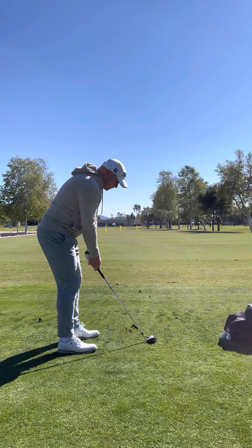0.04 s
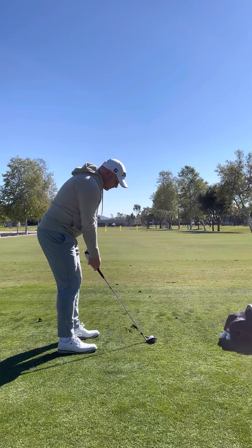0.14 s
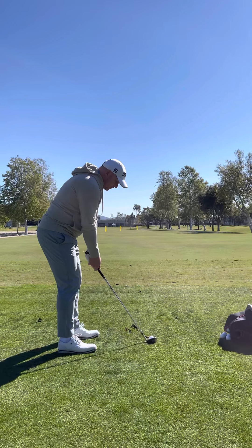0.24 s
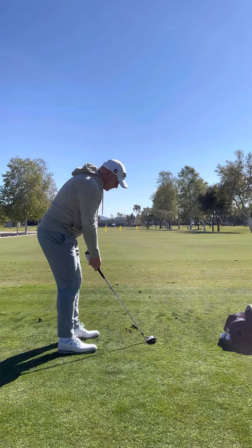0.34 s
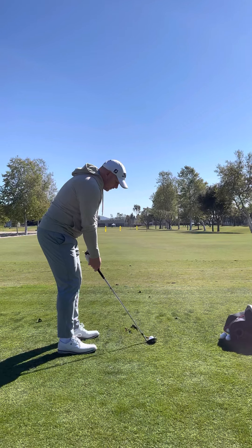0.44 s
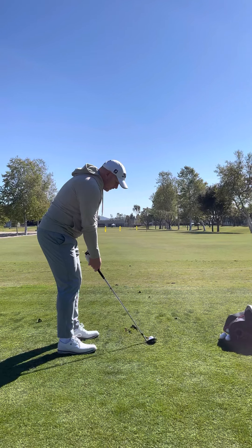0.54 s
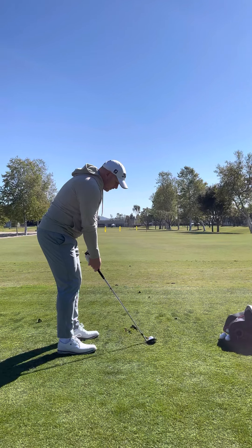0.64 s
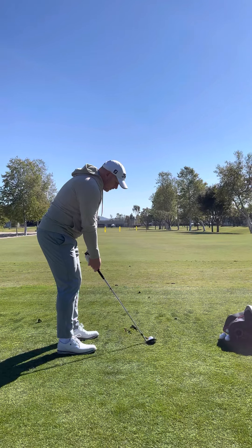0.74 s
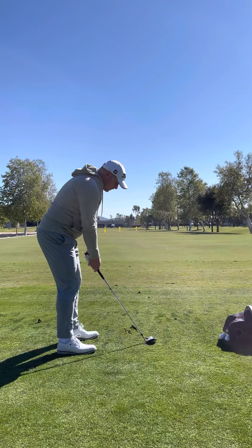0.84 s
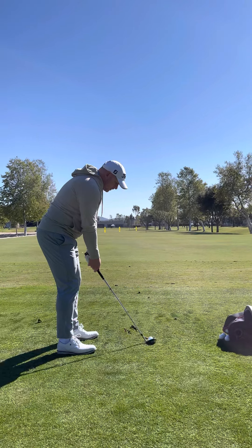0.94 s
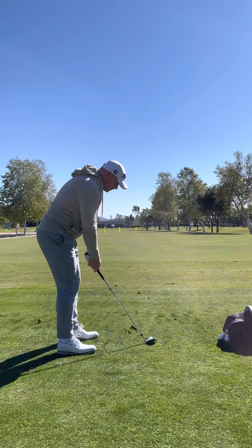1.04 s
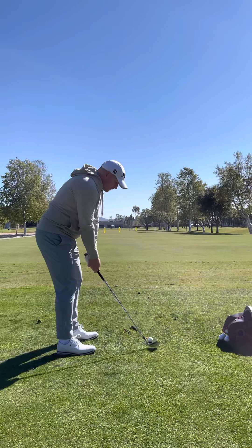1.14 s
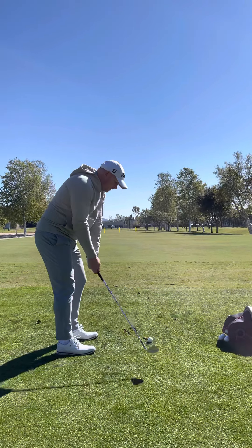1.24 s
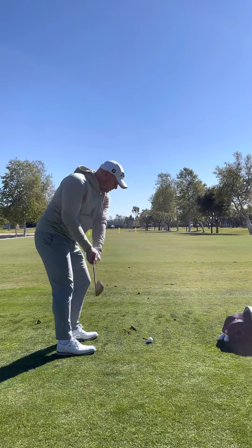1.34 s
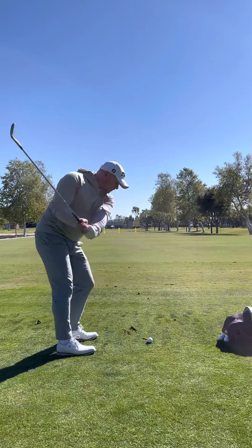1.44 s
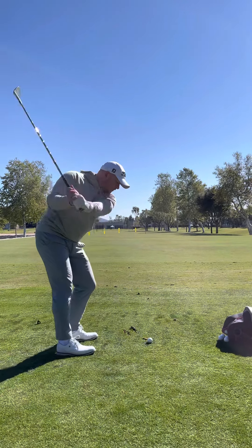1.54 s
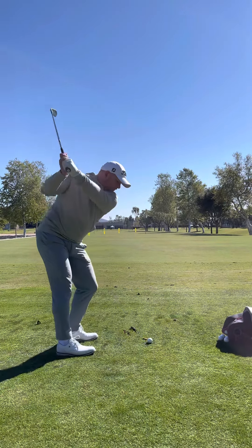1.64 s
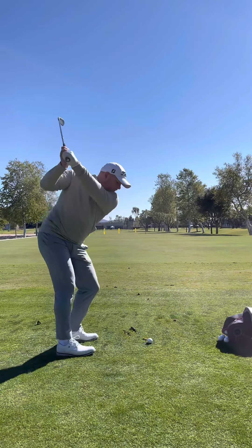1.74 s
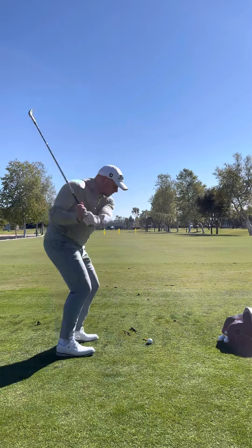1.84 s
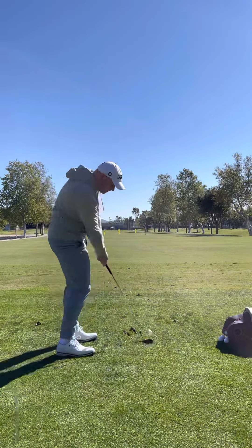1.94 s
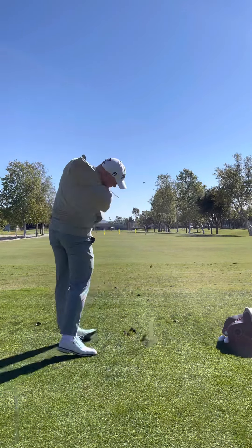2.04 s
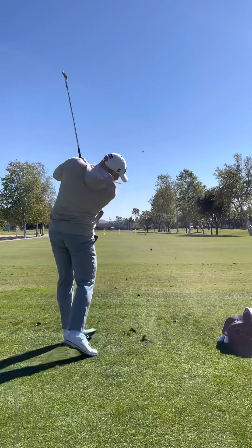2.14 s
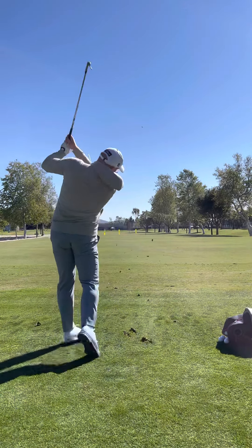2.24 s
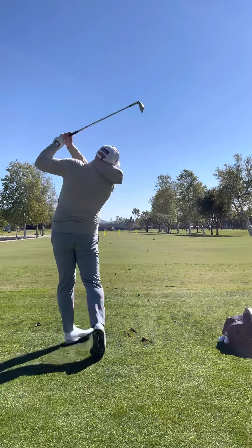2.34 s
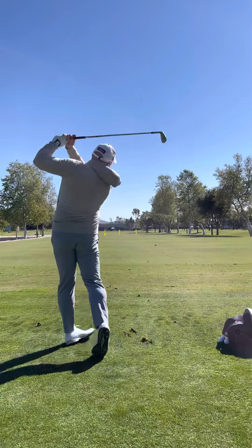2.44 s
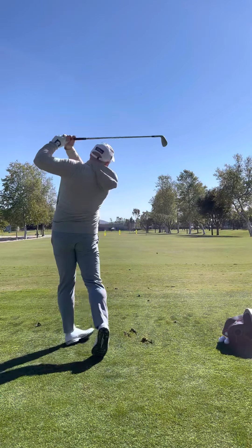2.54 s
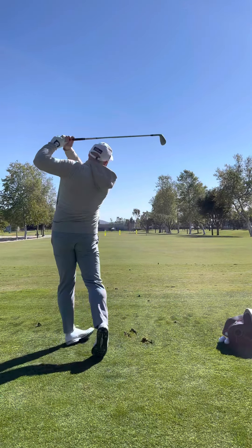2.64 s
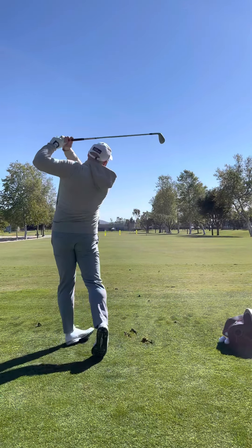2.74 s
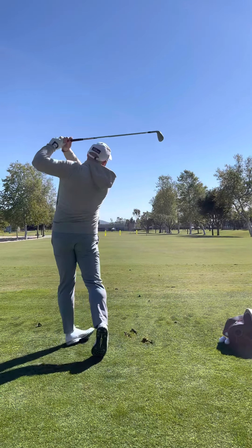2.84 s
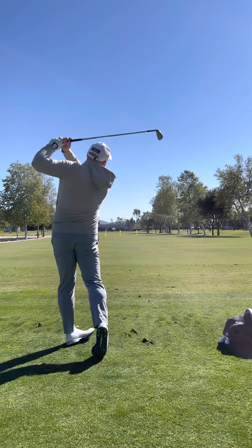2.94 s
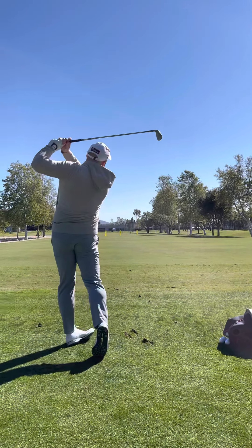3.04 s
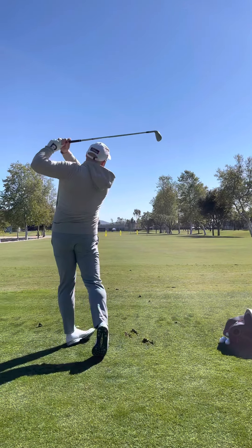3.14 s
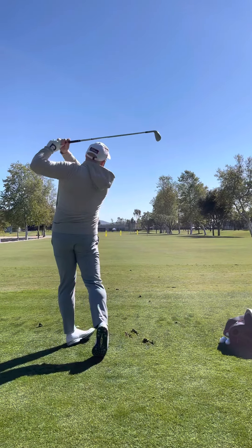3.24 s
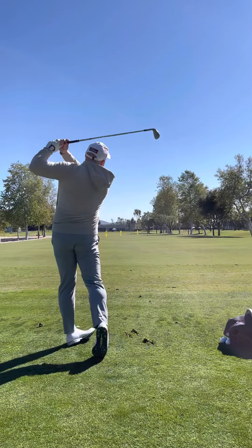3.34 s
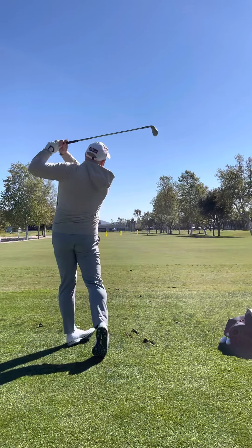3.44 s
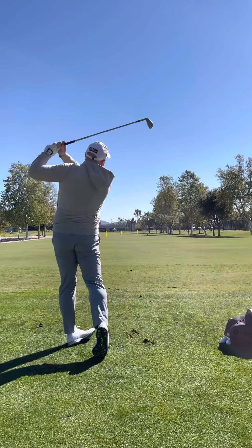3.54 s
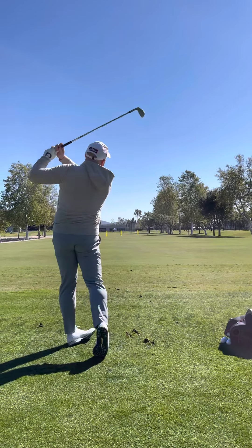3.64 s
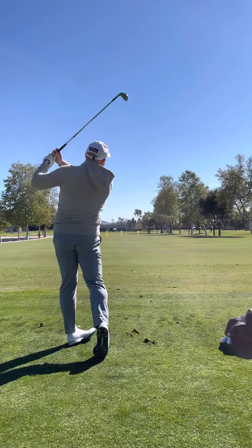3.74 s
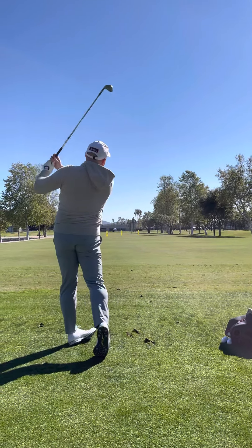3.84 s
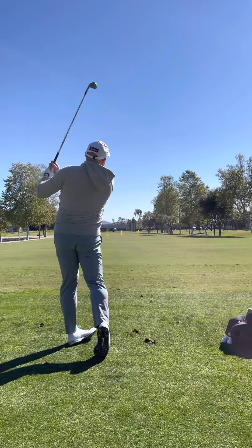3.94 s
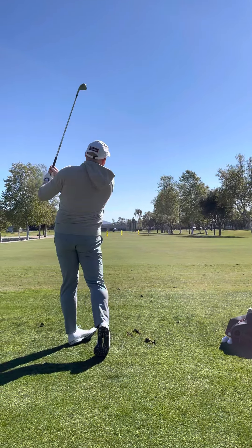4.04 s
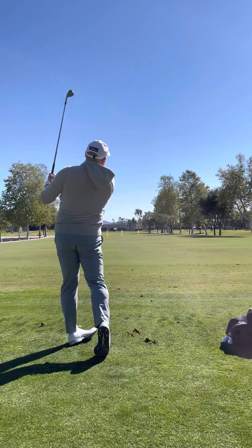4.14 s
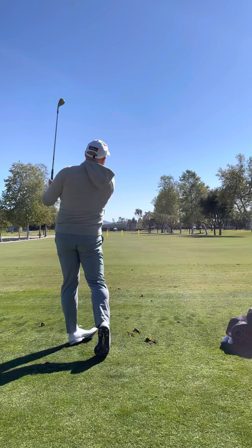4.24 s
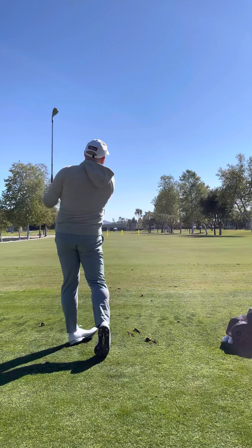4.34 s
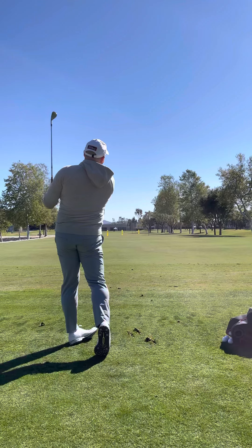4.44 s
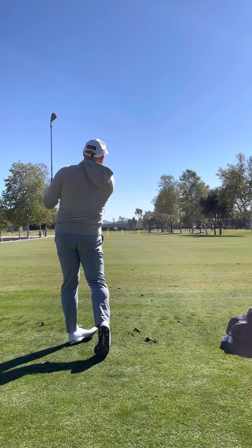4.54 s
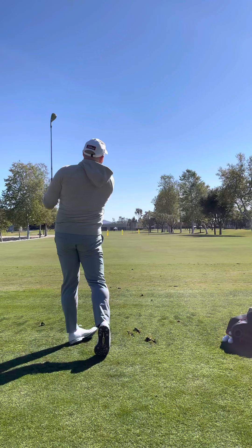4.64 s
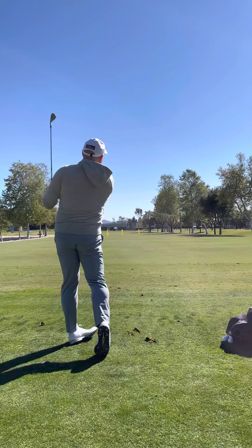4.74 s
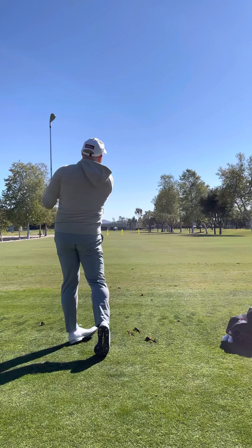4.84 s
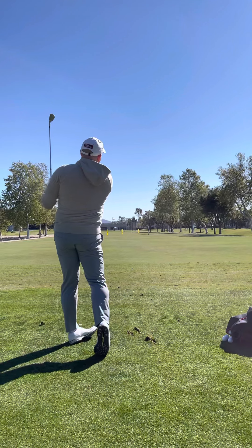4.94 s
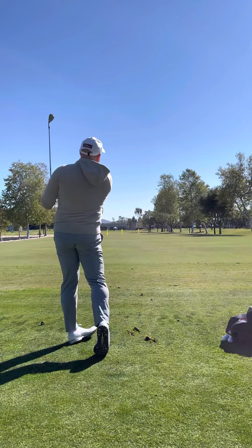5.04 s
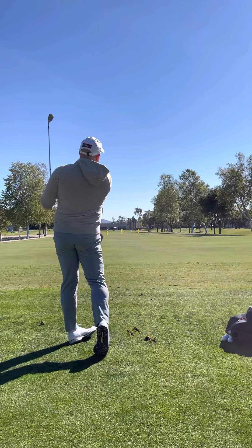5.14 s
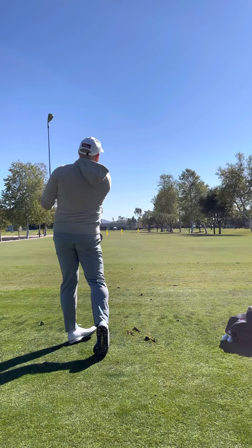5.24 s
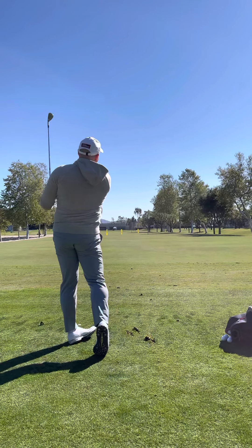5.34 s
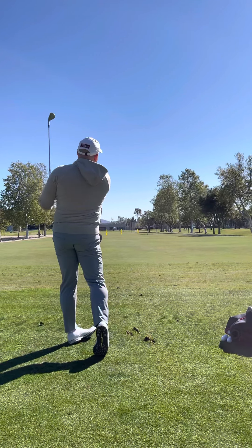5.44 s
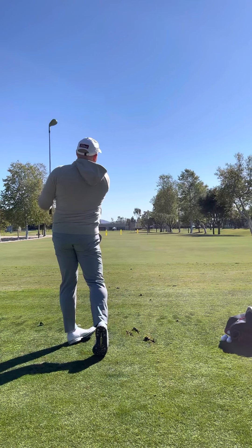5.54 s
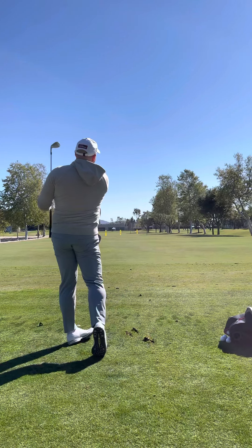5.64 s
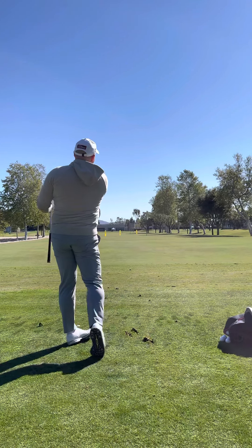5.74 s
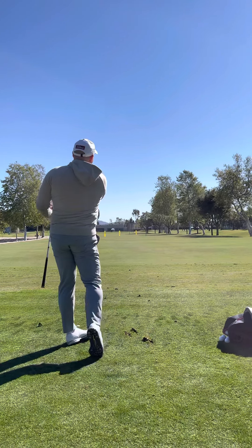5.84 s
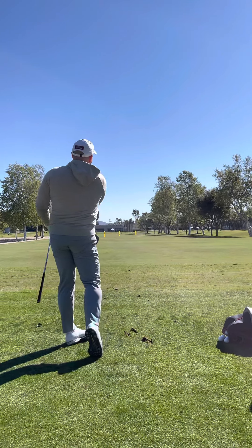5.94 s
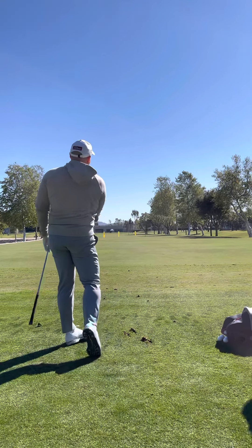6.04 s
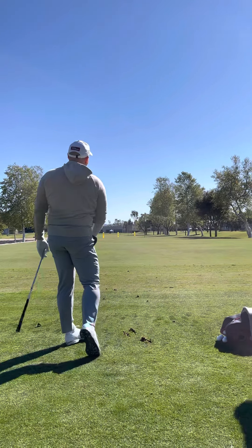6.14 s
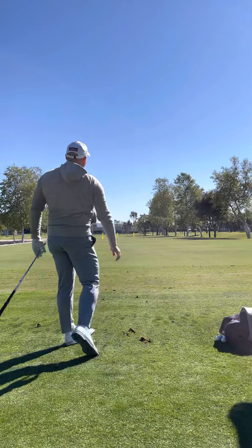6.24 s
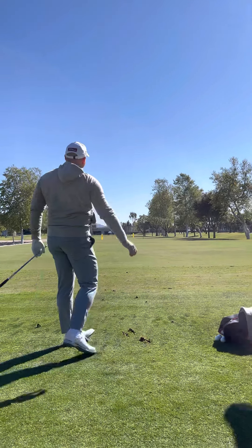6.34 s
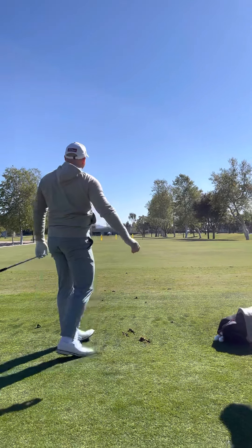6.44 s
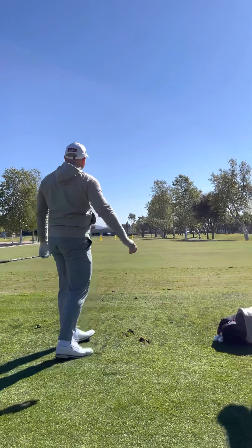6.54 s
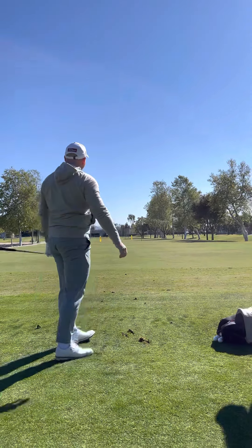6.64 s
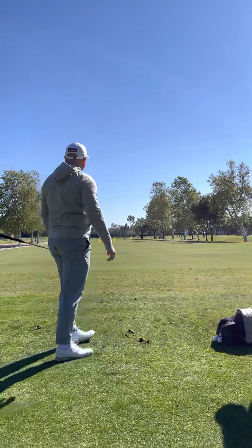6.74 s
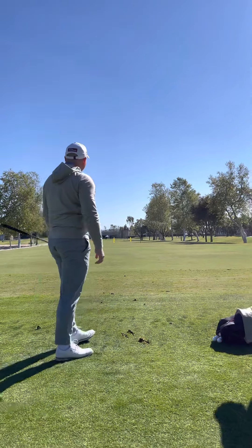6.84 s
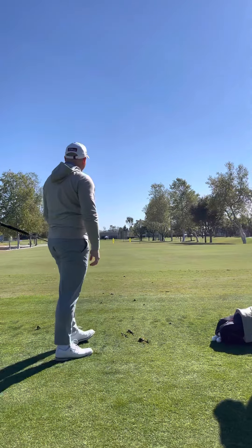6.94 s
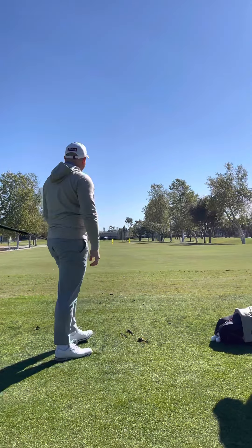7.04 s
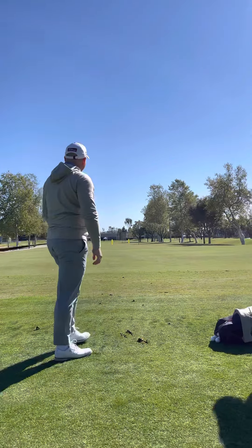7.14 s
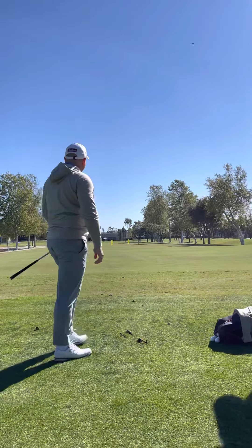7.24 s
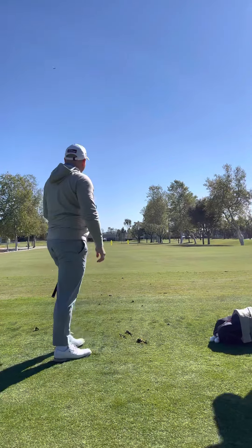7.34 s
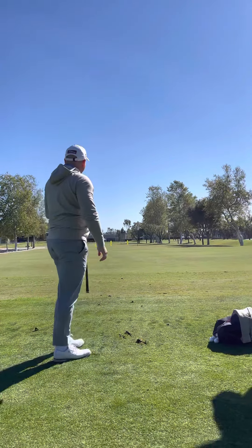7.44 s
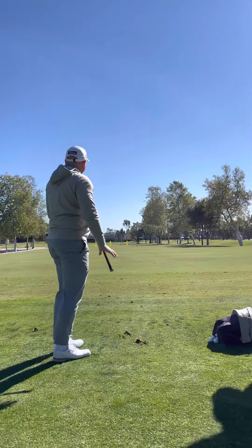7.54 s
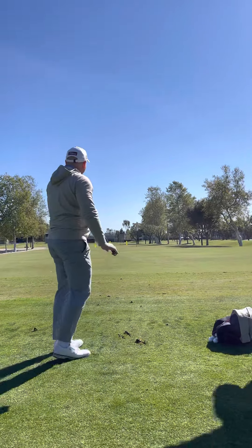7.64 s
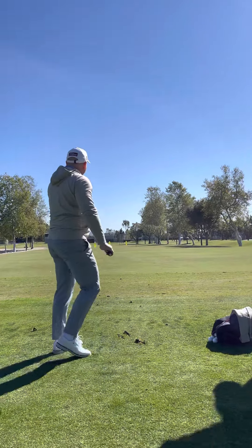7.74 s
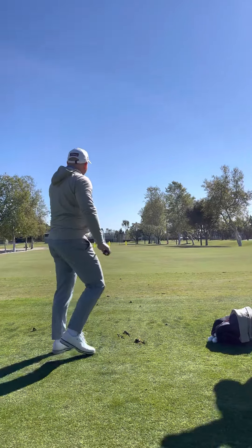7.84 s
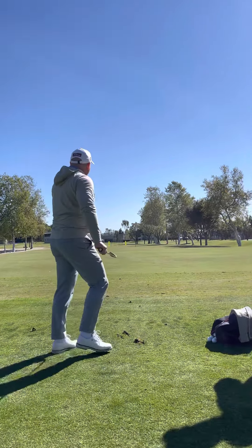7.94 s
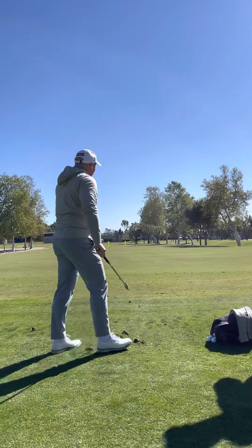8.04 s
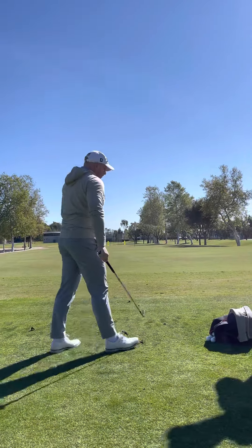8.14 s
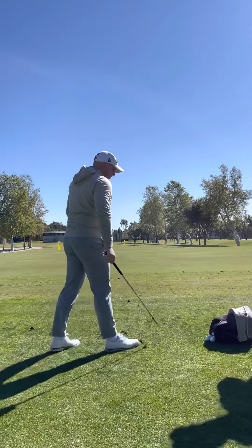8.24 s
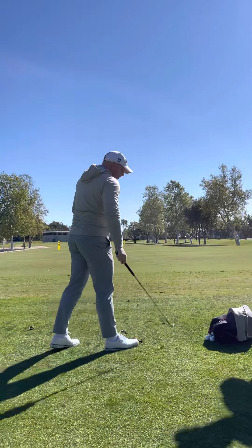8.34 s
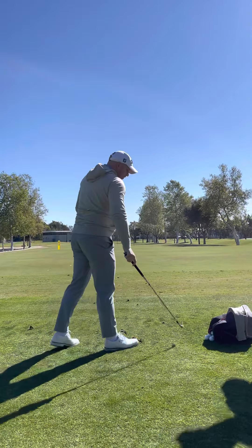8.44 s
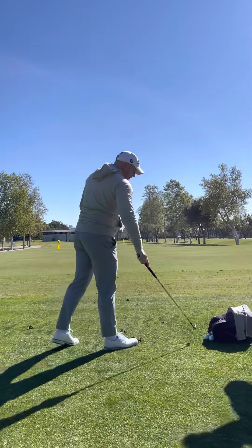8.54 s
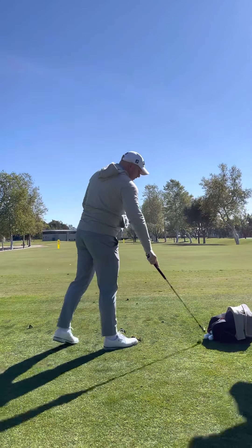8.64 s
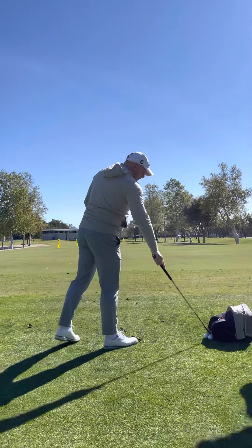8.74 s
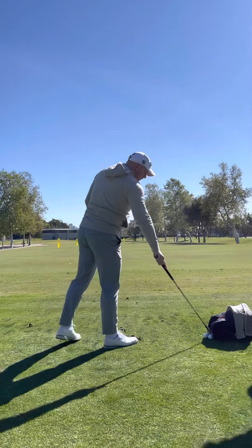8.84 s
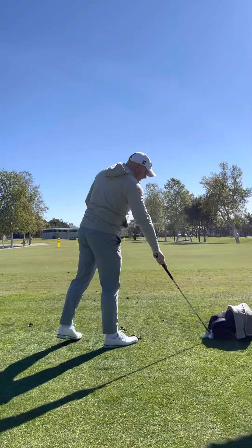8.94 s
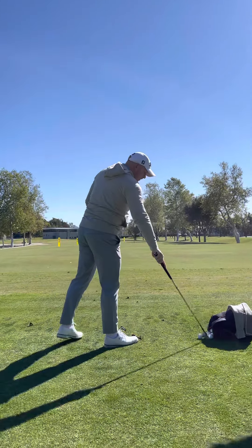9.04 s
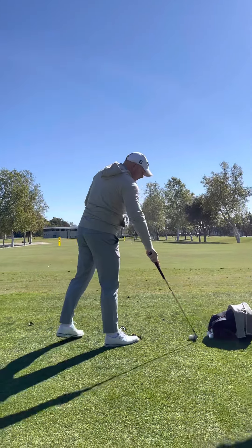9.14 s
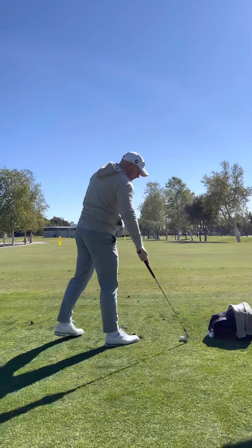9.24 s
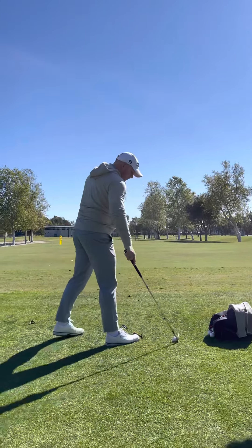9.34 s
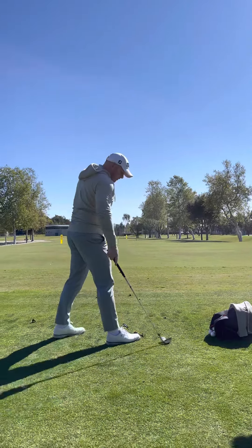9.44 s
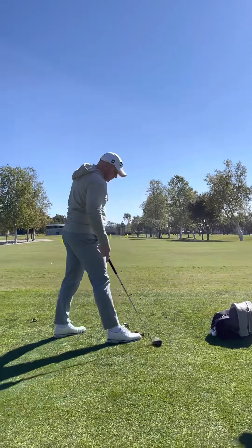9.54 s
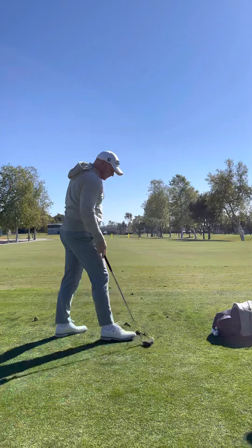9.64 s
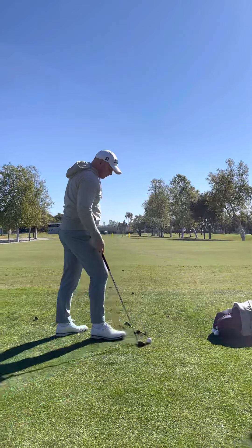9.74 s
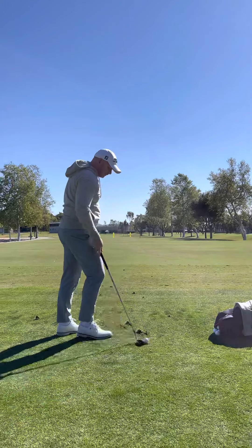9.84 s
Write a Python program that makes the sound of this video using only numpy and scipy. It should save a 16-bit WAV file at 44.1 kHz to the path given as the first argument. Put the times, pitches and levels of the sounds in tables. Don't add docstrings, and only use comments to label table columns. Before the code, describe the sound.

A golfer's iron shot heard close by a phone on open grass. Quiet rustling and light ticks precede a brief rush of air and one hard, bright crack with a deep ground thud and short tree echoes. Torn soil scatters and ticks back down. Quiet birds and far traffic follow, then moving clothes, a dull leg tap, a buzzy bird call, whistles, and a bumped stand with clicking balls.

```python
import sys
import numpy as np
from scipy import signal
from scipy.fft import rfft, irfft, next_fast_len
from scipy.io import wavfile
from scipy.ndimage import uniform_filter1d, map_coordinates

SR = 44100
rng = np.random.default_rng(int(sys.argv[2]) if len(sys.argv) > 2 else 0)


def volts_from_decibels(level):
    exponent = np.asarray(level, float) / 20
    return 10 ** exponent


def transcribe(signal):
    frames = np.atleast_2d(signal).T
    limited = np.clip(frames, -1, 1)
    pcm = np.round(limited * 32767).astype(np.int16)
    wavfile.write(sys.argv[1], SR, pcm)


N = 435708
SOIL_SETTLES_S = 2.89


def unit(x):
    return x / np.sqrt(np.mean(x ** 2) + 1e-20)


def along(points, hz):
    f, v = np.transpose(points)
    return np.interp(np.log(hz + 1), np.log(f + 1), v)


def curves(rows, **ends):
    s, *cols = np.transpose(rows)
    return [np.interp(np.arange(N) / SR, s, c, **ends) for c in cols]


def wobble(rate):
    knots = rng.standard_normal(int(N * rate / SR) + 4)
    return map_coordinates(knots, [np.arange(N) * rate / SR])


def filtered(x, response):
    m = next_fast_len(N + 8192)
    return irfft(rfft(x, m) * response(np.fft.rfftfreq(m, 1 / SR)), m)[..., :N]


def causal(points):
    cepstrum = irfft(np.log(volts_from_decibels(along(points, np.fft.rfftfreq(4096, 1 / SR)))))
    cepstrum[1:2048] *= 2
    cepstrum[2049:] = 0
    h = irfft(np.exp(rfft(cepstrum)))[:2048]
    return h / np.linalg.norm(h)


def pair(spectrum, alike, grain_db=0):
    noise = rng.standard_normal((2, N)) * volts_from_decibels(grain_db * wobble(500))

    def response(hz):
        turn = np.arccos(np.clip(along(alike, hz), -1, 1)) / 2
        return volts_from_decibels(along(spectrum, hz)) * [np.cos(turn), np.sin(turn)]

    mid, side = filtered(noise, response)
    return unit(np.array([mid + side, mid - side]))


def patchy(x, depth_db):
    z = signal.stft(x, nperseg=512)[2]
    field = uniform_filter1d(rng.standard_normal(z.shape[1:]), size=6, axis=0)
    field = uniform_filter1d(field, size=8, axis=1)
    return unit(signal.istft(z * volts_from_decibels(depth_db * unit(field)), nperseg=512)[1][:, :N])


def strokes(rows):
    t = np.arange(N) / SR
    total = 0
    for s, db, rise, fall, coarse_db in rows:
        swell = volts_from_decibels(db - 30 * np.maximum((s - t) / rise, (t - s) / fall))
        total = total + swell * volts_from_decibels([[0], [coarse_db]])
    return total


# (time [s], level [dB])
TRAFFIC = [(0.0, -44.5), (1.87, -43.5), (2.04, -46), (2.89, -42.5), (4.79, -43), (5.03, -42), (6.58, -44.5),
           (6.85, -45.5), (7.84, -44), (8.26, -46.5), (8.56, -43.5), (9.88, -44)]
# (frequency [Hz], density [dB per Hz])
AIR = [(22, -29.5), (40, -6), (65, -1), (90, -0.5), (130, -8.5), (200, -16), (300, -24.5), (600, -32.5),
       (1100, -35.5), (1600, -44), (2300, -50), (3200, -58), (4500, -61), (6000, -80)]
# (frequency [Hz], likeness [0-1])
AIR_ALIKE = [(60, .998), (110, .996), (200, .97), (400, .72), (700, .45), (1300, .75), (1800, .9),
             (2300, .4), (4500, .6), (7000, .8), (9000, .98)]
# (frequency [Hz], density [dB per Hz])
HISS = [(1500, -37), (3000, -5.5), (6000, -3), (8000, -2.5), (10500, 1.5), (11800, -2), (12600, -19),
        (14000, -40)]
# (frequency [Hz], density [dB per Hz])
LEAVES = [(1500, -30), (2400, -1), (3500, -2.5), (5000, -4.5), (5800, -10), (8000, -31), (12000, -70)]
# (start [s], end [s], leaf level [dB])
GUSTS = [
    (1.5, 2.6, -81.5),
    (5.5, 6.6, -82),
    (7.05, 7, -76.5),
    (9.9, 10.5, -74.5),
]


def background():
    t = np.arange(N) / SR
    rumble_db, = curves(TRAFFIC)
    hum_db = -59.5 + 0.16 * (rumble_db - rumble_db.mean())
    calm_db, gust_ramp_s = -91, 0.39
    leaves_db = calm_db
    for start, end, db in GUSTS:
        gust = np.clip(1 + np.minimum(t - start, end - t) / gust_ramp_s, 0, 1)
        leaves_db = leaves_db + (db - calm_db) * gust
    duck_s, duck_length_s, duck_db = 9.45, 0.048, -7.5
    hum_db += duck_db * np.exp(-((t - duck_s - duck_length_s / 2) / duck_length_s) ** 4)
    far = pair(AIR, AIR_ALIKE)
    low = filtered(far, lambda hz: 1 / (1 + (hz / 230) ** 4))
    rumble = volts_from_decibels(rumble_db + 2.0 + 0.33 * wobble(4.6)) * unit(low)
    hum = volts_from_decibels(hum_db + 3 + 0.55 * wobble(2.4)) * unit(far - low) * volts_from_decibels([[-.8], [.8]])
    leaves = volts_from_decibels(leaves_db + 9 + 1.4 * wobble(4.4)) * patchy(pair(LEAVES, AIR_ALIKE), depth_db=3.5)
    return rumble + hum + leaves + volts_from_decibels(-83.5) * pair(HISS, AIR_ALIKE)


# (frequency [Hz], time to fall 60 dB [s])
TREES = [(1000, 0.38), (3000, 0.37), (8000, 0.092), (13000, .03)]


def trees(x):
    hz, t, z = signal.stft(rng.standard_normal((2, SR // 2)), SR, nperseg=256)
    tail = signal.istft(z * volts_from_decibels(-60 * t / along(TREES, hz)[:, None]), SR, nperseg=256)[1]
    return signal.fftconvolve(x[None], tail / np.linalg.norm(tail[0]), axes=1)[:, :N]


def bird(notes, lead, pan_db=0, half_db=-60, buzz_hz=0, buzz=0, rough_db=-4.0, wet_db=-10,
         edge=0.013, scoop=0, fade_db=0, flat=1, warble=0.0062):
    z = np.zeros(N, complex)
    drift = 1 + warble * wobble(95)
    for s, length, start_hz, mid_hz, end_hz, db in notes:
        first = round(s * SR)
        u = np.linspace(0, 1, round(length * SR))
        v = .5 + np.sign(u - .5) * abs(2 * u - 1) ** flat / 2
        hz = start_hz * (1 - v) * (1 - 2 * v) + 4 * mid_hz * v * (1 - v) + end_hz * v * (2 * v - 1)
        hz *= drift[first:][:len(u)] - scoop * np.exp(-u * length / .005)
        phase = 2 * np.pi * np.cumsum(hz) / SR
        shape = np.clip(np.minimum(u, 1 - u) * length / edge, 0, 1) ** 0.46
        shape = shape * volts_from_decibels(fade_db * (u ** 3 - 0.17))
        flutter = 1 / (1 - buzz * np.exp(2j * np.pi * buzz_hz * u * length))
        tone = np.exp(1j * phase) * flutter
        tone = tone + volts_from_decibels(half_db) * np.exp(.5j * phase) + volts_from_decibels(half_db - 27) * np.exp(3j * phase / 2)
        z[first:][:len(u)] += np.sqrt(2) * volts_from_decibels(db) * shape * tone
    z *= volts_from_decibels(rough_db * wobble(110))
    direct = np.real([z * np.exp(.5j * lead), z * np.exp(-.5j * lead)])
    return direct * volts_from_decibels([[pan_db / 2], [-pan_db / 2]]) + volts_from_decibels(wet_db) * trees(z.real)


def calls(form, rows):
    length, start, end = form
    return [(s, length, start * hz, hz, end * hz, db) for s, hz, db in rows]


def song(form, rows):
    start, end = form
    return [(s, length, start * hz, hz, end * hz, db) for s, length, hz, db in rows]


SLIDE = (1.05, .91)
ARCH = (1.0, .895)
HOARSE = (.985, .965)
# (time [s], length [s], middle pitch [Hz], level [dB])
SLIDES = [(.163, .11, 2594, -67.5), (8.099, .105, 2380, -69), (8.346, .09, 2495, -69),
          (9.16, .1, 2633, -63), (9.36, .12, 2570, -65)]
ARCHES = [(3.535, 0.11, 2650, -59), (3.637, .064, 2584, -58.5), (7.253, .16, 2656, -60.5),
          (7.545, .115, 2470, -64), (7.826, .15, 2490, -68.5), (8.577, .096, 2594, -59),
          (9.594, .095, 2500, -63)]
HOARSES = [(.42, 0.18, 2376, -75.5), (3.345, .025, 2500, -77), (3.443, .022, 2620, -71),
           (8.777, .112, 2770, -62.5), (8.986, 0.073, 2646, -62)]
PIP = .023, .9, .88
REPLY = .075, 1.015, .98
SNAP = .042, .83, .81
SWEEP = .042, 0.97, 1.22
DOWN = .03, 1.13, 0.94
LEVEL = .03, 1.01, 0.96
UP = (.028, .93, 1.05)
TURN = (.015, 1.09, .89)
TRILL = (.04, .89, 1.03)
# (time [s], middle pitch [Hz], level [dB])
PIPS = [(8.28, 2470, -75), (8.525, 2570, -61.5), (8.93, 2920, -62.5), (9.102, 2860, -61.5),
        (9.305, 2720, -62), (9.525, 2600, -66)]
ANSWER = [(.67, 2600, -83), (.86, 2640, -73.5), (1.08, 2600, -75), (2.94, 2582, -75.5)]
SNAPS = [(5.385, 2630, -74), (5.59, 2600, -75), (5.783, 2640, -75), (6.005, 2640, -75), (2.565, 3950, -70)]
SWEEPS = [(0.734, 3370, -74.5), (.962, 3170, -70), (3.035, 3230, -71)]
DOWNS = [(3.885, 3225, -71.5), (3.99, 3150, -71), (4.095, 3220, -71), (4.2, 3210, -69), (4.34, 3200, -69.5),
         (5.33, 2905, -84), (5.5, 2970, -75), (5.53, 3200, -71.5), (5.695, 3120, -73), (5.725, 3200, -74),
         (5.95, 3070, -77)]
LEVELS = [(3.955, 2970, -76.5), (4.065, 3040, -75), (4.17, 2950, -76), (7.486, 3000, -76),
          (7.76, 3280, -75), (2.55, 3140, -70.5), (7.035, 3240, -78), (7.178, 3330, -75),
          (8.038, 3330, -77), (8.405, 3680, -78)]
UPS = [(6.965, 3573, -68), (7.092, 3510, -65.5), (7.232, 3480, -68), (7.36, 3387, -67.5)]
# (time [s], length [s], start [Hz], middle [Hz], end pitch [Hz], level [dB])
RASP = [
    (.118, .048, 2520, 2640, 2620, -70.5),
]
BUZZ = [
    (6.7, .35, 1480, 2185, 1560, -66),
]


def birds():
    clear = song(SLIDE, SLIDES) + song(ARCH, ARCHES) + calls(PIP, PIPS)
    whistles = bird(clear, .9, pan_db=.6, half_db=-6, rough_db=2, wet_db=-13, edge=.012,
                    scoop=.1, fade_db=-4)
    whistles += bird(song(HOARSE, HOARSES), .9, pan_db=.6, half_db=-9, buzz_hz=-140, buzz=.22,
                     rough_db=3, wet_db=-12, edge=.008, scoop=.07, fade_db=-2, warble=.022)
    replies = calls(REPLY, ANSWER) + calls(SNAP, SNAPS)
    whistles += bird(replies, 3.96, pan_db=6.0, rough_db=6, edge=.006)
    whistles += bird(RASP, 0.97, buzz_hz=130, buzz=0.5, rough_db=1.5, edge=.008, warble=.035, wet_db=-8)

    turns = [(s + .032, .97 * hz, db) for s, hz, db in UPS]
    trill = [(7.93 + k * .0655, 3700, -72) for k in range(5)]
    notes = calls(DOWN, DOWNS) + calls(LEVEL, LEVELS) + calls(UP, UPS) + calls(TURN, turns)
    chips = bird(notes, -1.1, pan_db=-4, wet_db=-8, rough_db=2.5, edge=.004)
    chips += bird(calls(TRILL, trill), -1.1, pan_db=-4, wet_db=-3, rough_db=4, edge=.002, fade_db=-16)
    chips += bird(calls(SWEEP, SWEEPS), -1.1, pan_db=-4, wet_db=0, rough_db=3.5, edge=.004, fade_db=-4)

    buzzer = bird(BUZZ, 0.41, buzz_hz=118.0, buzz=0.55, rough_db=1.5, edge=0.11, flat=1.55, warble=.004)
    return whistles + chips + buzzer


# (peak time [s], fine level [dB], rise [s], fall [s], coarse scrape over fine [dB])
CLOTH = [(.432, -78, 0.21, 0.13, 3), (.76, -101, .2, 0.46, 1), (.982, -99, 0.063, 0.16, 22),
         (1.21, -80.5, 0.075, .09, 12.5), (1.302, -74, 0.07, 0.2, 5), (1.4, -84.5, 0.12, 4.2, 5),
         (1.664, -77, 0.016, 0.049, 11), (1.9, -86, 0.41, 0.047, 4), (3.28, -86, 0.078, 1.03, 0),
         (3.538, -86, .1, 0.27, 0), (4.492, -87.5, 0.094, 0.5, 13), (4.628, -65.5, 0.011, 0.037, -1),
         (4.644, -82, 0.023, .17, -1), (6.352, -66.5, 0.29, 0.38, -0.5), (6.44, -65, 0.18, 0.13, -5.5),
         (6.712, -86.5, .45, 0.23, 2), (8.29, -85.5, .3, 0.47, 6.5), (8.5, -61.5, 0.029, 0.041, -10.5),
         (9.5, -87.5, 0.94, 0.31, 5), (9.524, -68, .02, 0.09, -15.5), (9.82, -72.5, 0.43, 0.63, 0.5)]
# (peak time [s], fine level [dB], rise [s], fall [s], coarse scrape over fine [dB])
SOIL = [
    (2.0, -53, .002, 0.024, 6),
    (2.016, -58.5, .004, 0.15, -6),
    (2.1, -59.5, 0.028, 0.76, -10),
    (2.401, -47, 0.018, 0.12, -1.5),
    (2.475, -76, 0.12, 0.41, -6),
    (2.671, -53, 0.026, 0.23, -4.5),
]
# (frequency [Hz], density [dB per Hz])
FINE = [(2500, -26.5), (4500, 0.5), (6500, 0.5), (8000, -0.5), (10500, 2.5), (11800, -6), (12400, -30),
        (14000, -58.5)]
# (frequency [Hz], density [dB per Hz])
COARSE = [(500, -40), (1300, -15.5), (2200, -5), (2700, -6.5), (3200, -1.5), (3800, -5.5), (4500, -4.5),
          (5300, -7), (8000, -43), (12000, -91.5)]


def rustle():
    settle_db = -600.5 * np.maximum(np.arange(N) / SR - SOIL_SETTLES_S, 0)
    fine, coarse = strokes(CLOTH) + volts_from_decibels(settle_db) * strokes(SOIL)
    close = [(1000, 0.35), (3000, .75), (5000, 0.76), (8000, 0.9)]
    rubbing = patchy(pair(FINE, close, grain_db=3.5), depth_db=3)
    scraping = patchy(pair(COARSE, close, grain_db=4), depth_db=3.5)
    return volts_from_decibels(4.0) * fine * rubbing + volts_from_decibels(7.5) * coarse * scraping


# (time [s], length [s], start [Hz], middle [Hz], end pitch [Hz], level [dB])
SQUEAK = [
    (6.415, 0.048, 10500, 10560, 10400, -55),
]


def glove_squeak():
    return bird(SQUEAK, -1.9, wet_db=-31.0)


# (time [s], level [dB], low knock over tick [dB])
TICKS = [(0.4221, -52, -3), (1.1893, -59, 3), (1.281, -62.5, 10), (1.6624, -68, 9), (1.6668, -39, 9.5),
         (2.1047, -40, -22), (2.2007, -51, 6), (2.2559, -62, 11), (2.2902, -51.5, 2), (2.3191, -43.5, -9),
         (2.3856, -38.5, -2), (2.5187, -56.5, -3), (2.6699, -34.5, -25.5), (2.828, -51, 0),
         (3.5417, -65, 0), (4.437, -58, -6.5), (4.4674, -59.5, -4), (4.486, -63, -12), (4.5196, -65, -2),
         (4.544, -59, -5), (4.6269, -50, -13), (4.6485, -59, -5), (6.357, -53, 7), (6.714, -55, -1),
         (8.4931, -55, -17), (8.93, -55, -11), (9.4617, -59.5, 8.5), (9.521, -57.5, 7),
         (9.5302, -49.5, -14), (9.553, -53, 0.5),
         (1.366, -59, 8.5),
    (1.445, -55, -12),
         (2.3513, -57, -2), (2.396, -34, -13), (2.404, -42.5, -13), (2.415, -42, -12),
          (2.426, -45.5, -10.5), (2.6612, -43.5, -8), (2.677, -36, -23), (2.6998, -46, -14),
          (4.538, -59, -3), (5.8407, -58.5, -16), (6.6817, -60, -5), (8.296, -61, -15.5), (9.8253, -57, 8),
          (9.846, -56, 8.5)]
# (frequency [Hz], width [Hz], level [dB])
GRIT = [(3200, 250, -1), (4560, 350, 1.5)]


def ticks():
    bright, dull = np.zeros(N + 2000), np.zeros(N + 2000)
    t = np.arange(2000) / SR
    for s, db, knock_db in TICKS:
        burst = volts_from_decibels(db - 60 * t / 0.016) * rng.standard_normal(len(t))
        bright[round(s * SR):][:len(t)] += burst
        dull[round(s * SR):][:len(t)] += volts_from_decibels(knock_db) * burst
    knock = causal([(200, -11), (800, 2.0), (1500, -1.0), (3400, -10.5), (6000, -37.0), (12000, -82)])
    falling = (np.arange(N) / SR < SOIL_SETTLES_S) * strokes(SOIL[3:])[0]
    shower = falling * unit(rng.standard_normal(N) * volts_from_decibels(5.6 * wobble(300)))

    def ringing(f):
        modes = sum(volts_from_decibels(db) * 1j * f * w / (c * c - f * f + 1j * f * w) for c, w, db in GRIT)
        return (f < 8500) * modes

    grit = filtered(bright[:N] + volts_from_decibels(0.5) * shower * np.sqrt(6), ringing)
    clicks = volts_from_decibels(-6.5) * signal.fftconvolve(bright, causal(FINE))[:N]
    clicks = clicks + volts_from_decibels(-0.5) * signal.fftconvolve(dull, knock)[:N]
    return clicks + volts_from_decibels(8) * grit


def thuds(blows, cycles_to_fall, shake_db, swell=0.58, linger_db=-19):
    out, shake = np.zeros(N), np.zeros(N)
    t = np.arange(SR // 4) / SR
    for s, db, start_hz, end_hz, t60 in blows:
        fall = cycles_to_fall / start_hz
        cycles = end_hz * t + (start_hz - end_hz) * fall * (1 - np.exp(-t / fall))
        rise = 1 - np.exp(-(t / (swell * fall)) ** 2)
        out[round(s * SR):][:len(t)] += volts_from_decibels(db - 60 * t / t60) * rise * np.cos(2 * np.pi * cycles)
        dying = volts_from_decibels(db - 60 * t / 0.064) + volts_from_decibels(db + linger_db - 60 * t / .8)
        shake[round(s * SR):][:len(t)] += (start_hz / 500) ** 2 * rise * dying
    dull = [(120, -12), (300, 0), (550, -10), (1200, -26), (4000, -60), (9000, -120)]
    return out + volts_from_decibels(shake_db) * shake * pair(dull, [(300, 0.86)])


# (time [s], peak level [dB], start pitch [Hz], end pitch [Hz], time to fall 60 dB [s])
BUMPS = [
    (9.4625, -33.5, 903, 69.8, 0.16),
    (9.522, -34, 1200, 250, .03),
    (9.538, -40, 900, 300, .03),
    (9.553, -37, 1200, 400, .028),
]


def stand_bumps():
    return thuds(BUMPS, 3.1, shake_db=-25.5) * [[1], [-1]]


# (time [s], peak level [dB], start pitch [Hz], end pitch [Hz], time to fall 60 dB [s])
THUDS = [
    (1.9835, -15, 62, 60, .2),
    (2.3895, -14, 300, 70, .075),
    (6.358, -23, 800, 480, .055),
]
LEG = [
    (6.3575, -17.5, 666, 71, .1),
]
DIVOT = [
    (1.9926, -8, 520, 70, .03),
]
SOD = [
    (1.9947, -13, 190, 170, .035),
]


def body_and_turf_blows():
    blows = thuds(THUDS, 2.6, shake_db=-17.0)
    blows += thuds(LEG, 3.9, shake_db=-20, swell=.95, linger_db=-10)
    blows += thuds(DIVOT, 2.1, shake_db=-29, swell=1.45)
    return blows + thuds(SOD, .5, shake_db=-29, swell=1)


# (time [s], level [dB])
SWISH = [
    (1.88, -87),
    (1.924, -65.5),
    (1.95, -41.5),
    (1.978, -37),
    (1.99, -19),
    (2.008, -53),
    (2.062, -65),
    (2.224, -58.5),
    (2.36, -63.5),
]
# (frequency [Hz], density [dB per Hz])
SHAFT = [(150, -13), (450, 4), (1100, -5.5), (2300, -4), (4500, -15.5), (8000, -20.5), (10700, -12),
         (12000, -30), (14500, -61.5)]


def swish():
    speed_db = np.minimum(curves(SWISH, left=-120, right=-120)[0], -37)
    return volts_from_decibels(speed_db + 3.5) * pair(SHAFT, [(500, .9), (3000, .75), (8000, 0.82)], grain_db=2)


def club_head_ring():
    out = np.zeros(N)
    t = np.arange(2000) / SR
    tone = np.sin(2 * np.pi * 2510 * t) * (1 - np.exp(-t / .0008))
    out[round(1.9896 * SR):][:len(t)] = volts_from_decibels(-10 - 60 * t / 0.019) * tone
    return out * volts_from_decibels([[1.5], [-1.5]]) * [[1], [-1]]


# (time [s], level [dB])
STRIKE = [
    (1.986, -19),
    (1.988, -1.5),
    (1.989, -5.5),
    (1.99, -4),
    (1.9905, -6.5),
    (1.9932, -13),
    (1.997, -26),
    (2, -31),
]
# (frequency [Hz], density [dB per Hz])
FACE = [(250, -19), (600, 2), (850, 0), (1100, -4), (1500, 6), (1900, 2), (2300, 1), (3200, -4), (4200, 1),
        (4800, -3), (5400, -12), (8000, -9), (9500, -2), (11500, -5), (13000, -23), (15600, -28),
        (15850, -70)]


def strike():
    blows = np.zeros((2, N))
    t = np.arange(600) / SR
    for s, db in STRIKE:
        a, b = rng.standard_normal((2, len(t))) * volts_from_decibels(db - 60 * t / .006)
        a[0] = 2.0 * volts_from_decibels(db)
        blows[:, round(s * SR):][:, :len(t)] += [a + .15 * b, a - .15 * b]
    near = blows[:, round(STRIKE[0][0] * SR) - 100:][:, :1024].sum(axis=0)
    power = uniform_filter1d(abs(rfft(near)) ** 2, size=11)
    even = np.sqrt(power.mean() / power)
    blows = filtered(blows, lambda hz: np.interp(hz, np.fft.rfftfreq(1024, 1 / SR), even))
    crack = signal.fftconvolve(blows, causal(FACE)[None], axes=1)[:, :N]
    return volts_from_decibels(-3.5) * crack + volts_from_decibels(-33) * trees(crack[0])


# (frequency [Hz], lead [radians])
FAR_LEAD = [(100, 0), (1900, 0), (2500, 3.1), (3100, 4.5), (4400, 3.3), (5400, 3.1), (5900, .2),
            (7000, 1.2), (9150, 3.14), (11400, 5.2), (12300, 6.28)]
SWING_LEAD = [(100, -.1), (500, -.5), (1500, 0), (4100, .7), (4700, 3), (5100, 3), (5600, 0), (6500, .5),
              (7400, 2), (9250, 3.14), (11400, 5.2), (12300, 6.28)]
GROUND_LEAD = [(100, 0), (1850, 0), (2200, 2.4), (2650, 3), (3100, 4.5), (3600, 3.8), (4000, 3.14),
               (4550, 2.2), (4950, 3.14), (5400, 2.9), (5900, 1.2), (7000, 1.3), (9150, 3.14), (11400, 5.2),
               (12300, 6.28)]
# (frequency [Hz], left over right [dB])
SWING_LEAN = [(100, 0), (250, -2.5), (700, -5), (1100, -5), (1500, -1.5), (2100, 0)]
GROUND_LEAN = [(300, -3), (900, -1.5), (1900, 0), (2300, 5), (2700, 5), (3100, -2), (3600, -5), (4200, 0),
               (5200, -3), (6700, -3), (7500, 0)]


def beams(x, lead, lean):
    def response(hz):
        left = np.exp(.5j * along(lead, hz)) * volts_from_decibels(along(lean, hz) / 2)
        return left ** np.array([[1], [-1]])

    return filtered(x, response)


def scene():
    far = beams(background(), FAR_LEAD, [(100, 0.002)]) + birds()
    ground = beams(rustle() + ticks(), GROUND_LEAD, GROUND_LEAN)
    swing = beams(body_and_turf_blows() + swish() + strike(), SWING_LEAD, SWING_LEAN)
    return far + ground + glove_squeak() + stand_bumps() + club_head_ring() + swing


def low_pass(x):
    return signal.sosfilt(signal.butter(12, 15850, fs=SR, output="sos"), x)


# (center [Hz], half width [Hz])
MID_GAPS = [(9000, 640), (4950, 150), (16500, 3500)]
SIDE_GAPS = [(1720, 300), (6050, 270), (16500, 4700)]


def record(dry):
    def weaken(gaps, db):
        return lambda hz: volts_from_decibels(db * sum(np.exp(-((hz - c) / w) ** 6) for c, w in gaps))

    mid = filtered(dry[0] + dry[1], weaken(MID_GAPS, db=-6.5)) / 2
    side = filtered(dry[0] - dry[1], weaken(SIDE_GAPS, db=-9.0)) / 2
    both = np.array([mid + side, mid - side])
    both = both / (1 + abs(both / .9) ** 6) ** (1 / 6)
    return low_pass(both)


dry = scene()
out = record(dry)
transcribe(out)
```